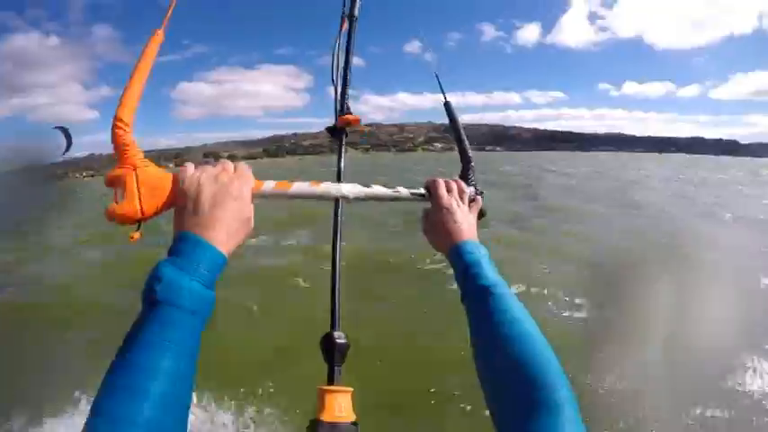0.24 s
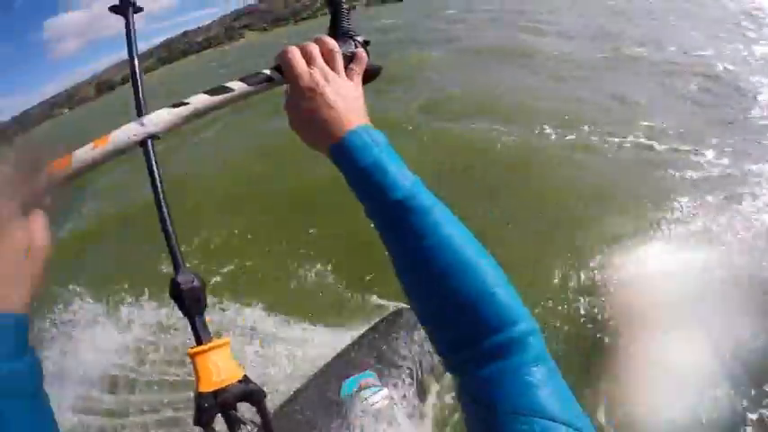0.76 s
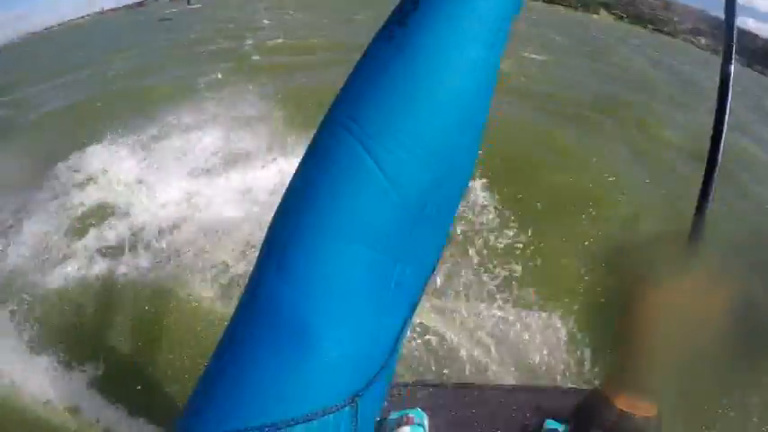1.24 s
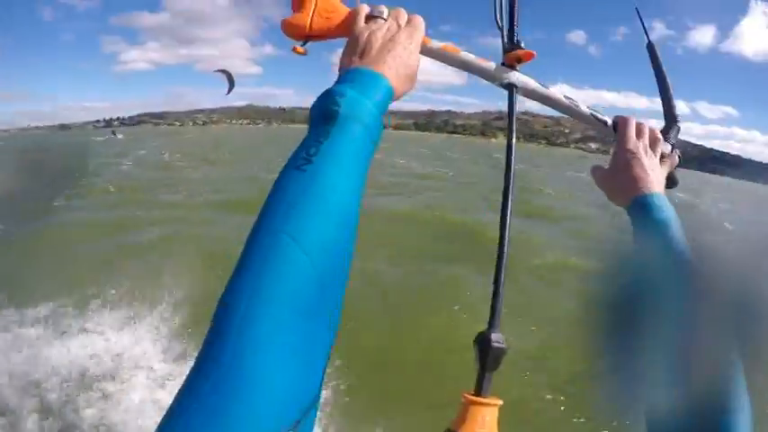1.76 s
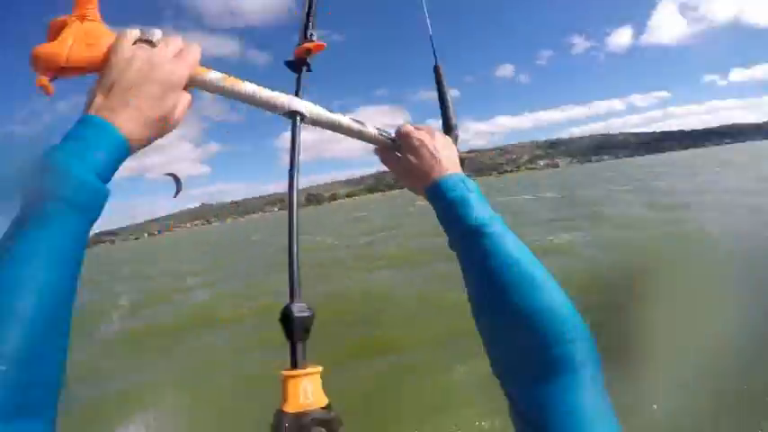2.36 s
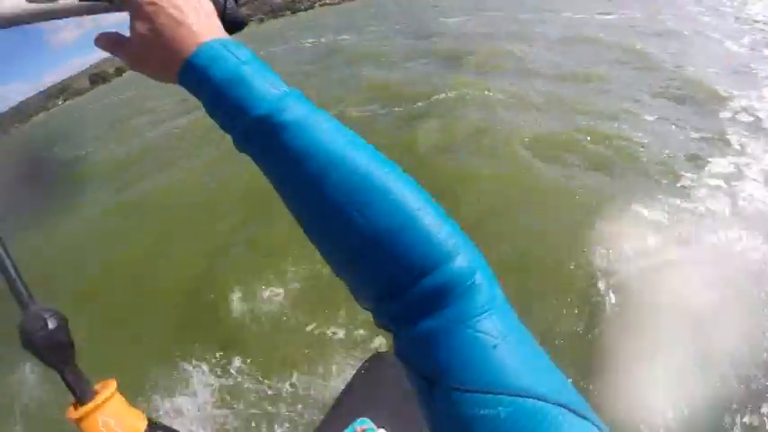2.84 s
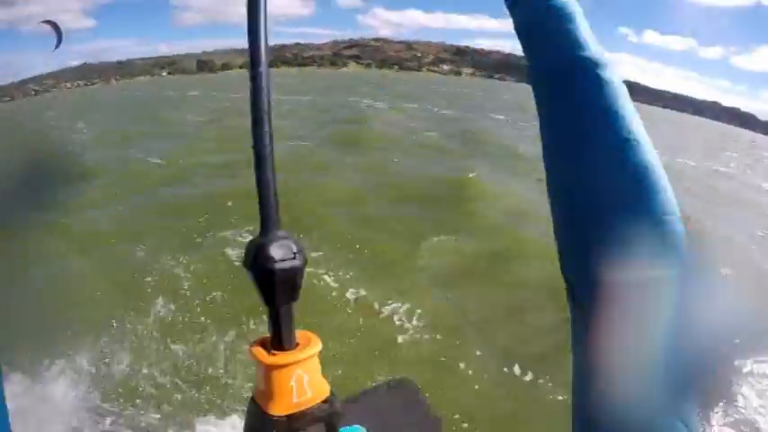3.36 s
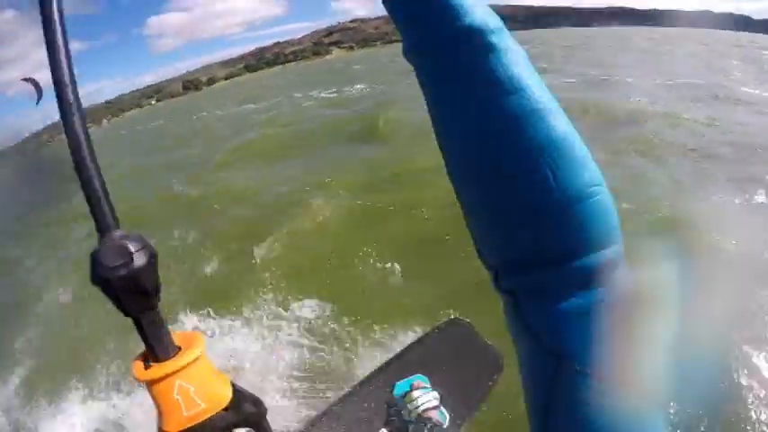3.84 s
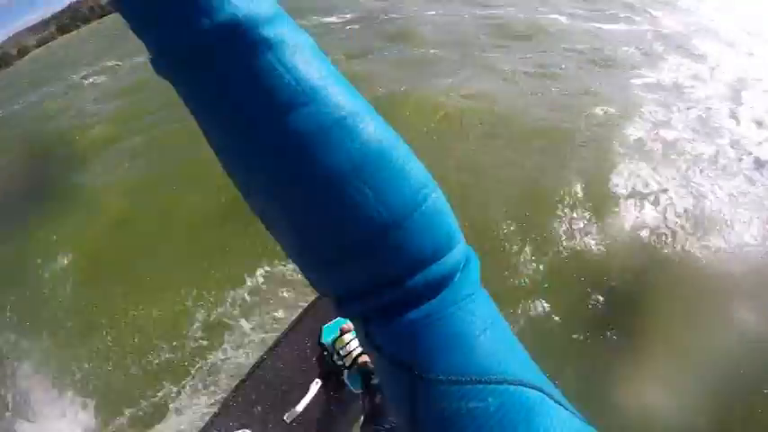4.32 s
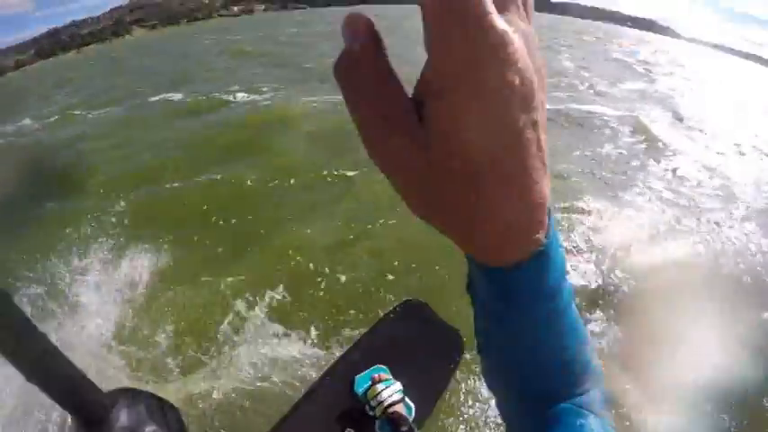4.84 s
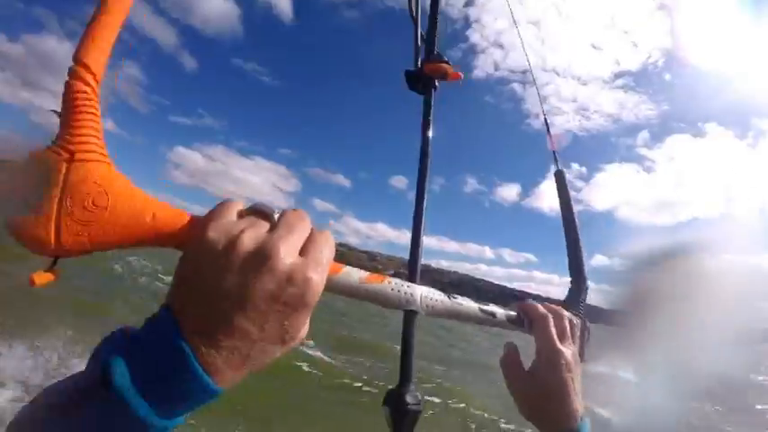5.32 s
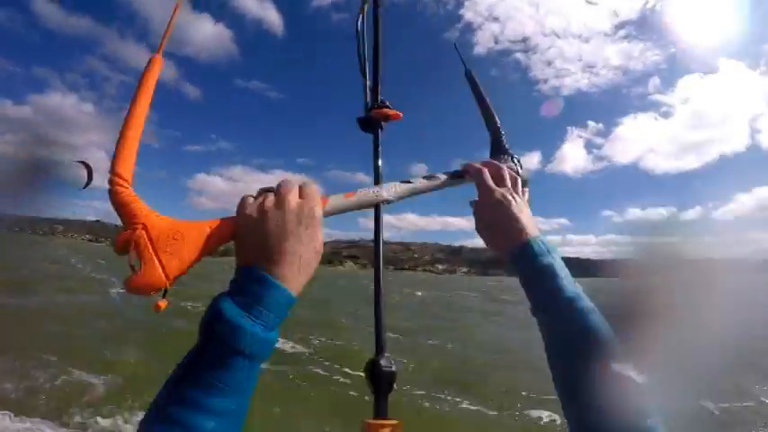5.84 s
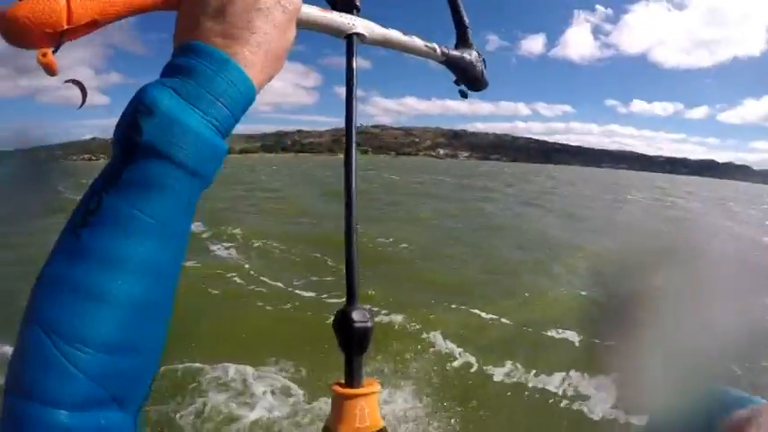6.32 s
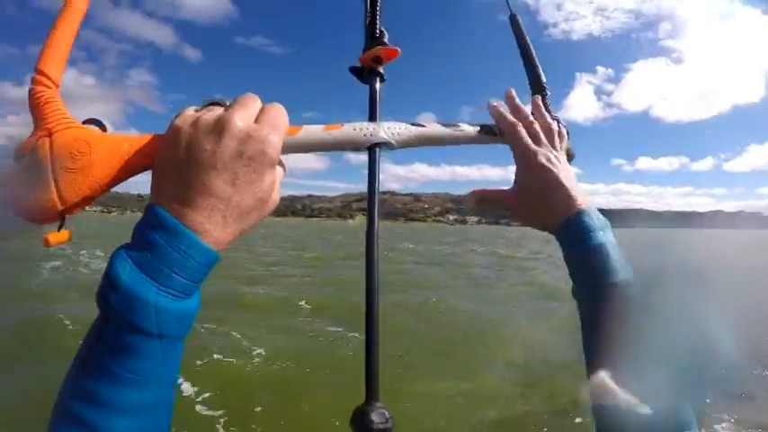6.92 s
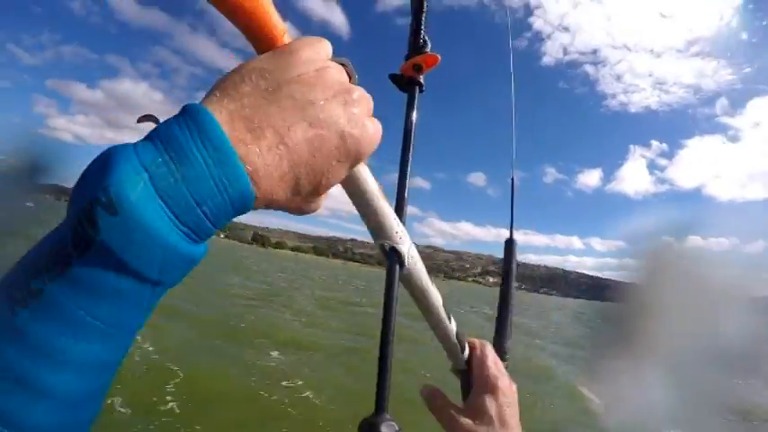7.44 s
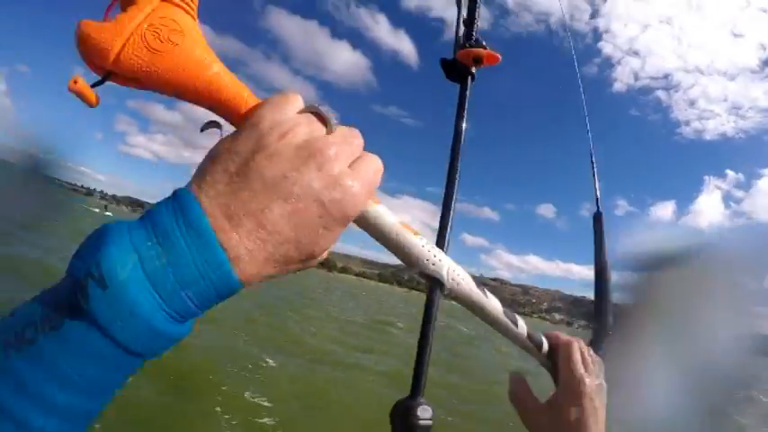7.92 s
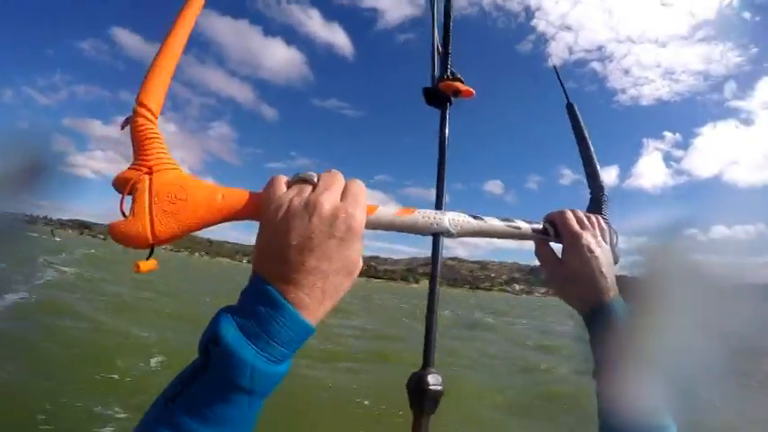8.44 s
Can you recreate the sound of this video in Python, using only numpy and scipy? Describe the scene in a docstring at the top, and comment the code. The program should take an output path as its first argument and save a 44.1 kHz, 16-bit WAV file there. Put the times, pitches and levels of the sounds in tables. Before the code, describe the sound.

Lumpy low wind rumble and rushing, hissing wake from a kiteboard, a few dull thumps, then a hand knocks hard on the camera housing.

```python
"""A lumpy wind rumble and a rushing, hissing wake fill a kiteboard ride, heard inside a waterproof housing.
Wind, rush and spray are shaped noise, with random grains in the water; chop drums dully on the board and the
kite lines sing faintly as narrow bands of noise. A few low thumps come early, the first two from wind buffets;
from about 6.2 s a hand rubs and knocks the housing: grainy noise, ringing modes and more low thumps. The two
hardest knocks, near 6.7 s, duck the camera's gain, which creeps back as the ride goes on more quietly."""
import sys
import numpy as np
from scipy import signal
from scipy.fft import rfft, irfft
from scipy.io import wavfile
from scipy.ndimage import uniform_filter1d

SR = 44100
rng = np.random.default_rng(int(sys.argv[2]) if len(sys.argv) > 2 else 0)


def materialize(psi):
    """Save the field psi as 16-bit PCM at rate SR to the path in sys.argv[1].

    A 1-D psi becomes a single channel; in a 2-D psi each row is a channel.
    """
    bounded = np.clip(np.atleast_2d(psi).T, -1, 1)
    quanta = np.round(bounded * 32767).astype(np.int16)
    wavfile.write(sys.argv[1], SR, quanta)


N = 382788
TIME = np.arange(N) / SR  # s
HZ = np.fft.rfftfreq(N, 1 / SR)

# All levels below are set at the source, ahead of layer trims, the housing and the gain control.

# Gusts on the housing. Each row: peak time in seconds, level in dB.
GUSTS = [(0.079, -32), (0.33, -36), (0.61, -32.5), (.85, -40), (1.05, -34), (1.24, -32.5), (1.64, -23.5),
         (1.84, -31), (2.09, -25.5), (2.37, -31), (2.62, -33.5), (2.85, -41), (3.12, -31.5), (3.36, -35.5),
         (4.05, -32), (4.26, -30), (4.47, -29), (4.8, -30), (5.17, -30.5), (5.36, -28.5), (5.58, -37.5),
         (5.76, -33.5), (5.94, -37.5), (7.02, -34.5), (7.28, -33), (7.45, -38), (7.68, -38), (7.85, -36),
         (8.22, -33)]
GUST_RISE_S, GUST_FALL_S = 0.056, 0.064
BREEZE_DB, BREEZE_FOLLOW = -36, 0.22  # steady headwind, and its dB per dB of the wake

# The kite pulls and its lines sing.
# Each row: start and end in seconds, hum of the thick lines in dB, whistle of a thin line in dB.
PULLS = [(1.13, 1.35, -52, -55), (1.48, 1.72, -56, -58), (2.02, 2.12, -51.5, -47), (2.3, 2.38, -55.5, -50),
         (2.62, 2.85, -73, -54), (4.2, 5.8, -65, -66), (7.3, 8.5, -66, -75)]
HUM_COLUMN, WHISTLE_COLUMN = 2, 3
HUM_REST_DB, WHISTLE_REST_DB = -74.5, -64  # the lines between pulls
SING_FOLLOW = 0.3  # dB per dB of the wake, between pulls
SING_RISE_S, SING_FALL_S = 0.062, 0.07
# Tones of the thick lines and of the thin one. Each row: frequency in Hz, width in Hz, level in dB.
LINE_TONES = [(567, 46, -4), (659, 47, -8)]
WHISTLE_TONES = [(2460, 100, 0)]

# Chop drumming on the underside of the board. Each row: time in seconds, level in dB.
CHOP = [(0, -53), (.95, -52), (1.15, -48.5), (1.6, -50), (2.1, -50.5), (3.5, -51.5), (3.75, -57.5),
        (4.16, -46.5), (4.9, -47), (5.3, -49.5), (6.1, -54), (7.4, -56), (8.68, -58.5)]

# How hard the board's edge churns the water. Each row: time in seconds, level in dB.
WAKE = [(0, -43), (.14, -45), (.3, -41.5), (.85, -43), (1.0, -43.5), (1.3, -43.5), (1.7, -40.5),
        (2.2, -42.5), (2.5, -40.5), (3.1, -41.5), (3.75, -45.5), (4.0, -42.5), (4.2, -40.5), (5.6, -41),
        (6.1, -45.5), (7.4, -48.5), (8.15, -50.5), (8.68, -49)]
# The edge digs into a wave and the rush swells. Each row: peak time in seconds, level in dB, length in seconds.
CARVES = [(.35, -48, 0.12), (.8, -44.5, 0.19), (1.6, -44, 0.19), (2.04, -42.5, 0.081), (2.34, -37.5, 0.15),
          (4.22, -42.5, 0.24), (4.6, -40, 0.19), (5.2, -44, 0.13), (7.38, -47.5, .2), (7.97, -47.5, 0.11)]
# The board meets a wave and throws a sheet of spray.
# Each row: peak time in seconds, hiss level in dB, length in seconds.
SPRAYS = [(0.477, -46, 0.21), (0.777, -49.5, 0.29), (0.95, -45.5, 0.076), (1.132, -45.5, 0.28),
          (1.603, -44.5, 0.3), (1.77, -46, 0.21), (2.04, -47.5, 0.17), (2.198, -46, 0.21),
          (2.35, -43, 0.16), (2.69, -45, 0.14), (3.16, -44.5, 0.3), (3.66, -47, 0.2), (3.812, -46, 0.17),
          (4.28, -46.5, 0.28), (4.573, -47, 0.37), (5.193, -42.5, 0.12), (5.565, -50, 0.21),
          (5.8, -48, 0.28), (7.273, -52.5, 0.18), (7.45, -58, 0.15), (7.998, -57.5, 0.11),
          (8.22, -61, 0.14), (8.556, -58, 0.48)]
WAVE_RISE_SHARE = 0.51  # part of a spray's or carve's length spent rising
# Fine spray that trails the board between the sheets. Each row: time in seconds, hiss level in dB.
MIST = [(0, -49.5), (6.1, -50), (7.0, -55.5), (7.7, -58.5), (8.68, -52.5)]
MIST_FIZZ_DB, SHEET_FIZZ_DB = -13, -12.5  # fizz of the finest drops against the hiss
# Lean of the rush to the treble: without spray, and added by a full sheet.
BUBBLE_TILT_DB, SPRAY_TILT_DB = -1, 1

# Strokes of the hand on the housing.
# Each row: peak time in seconds, level in dB, rise and fall in seconds, grip from 0 (brushing) to 1 (scraping).
RUBS = [(6.267, -27, 0.022, 0.0086, 0.83), (6.29, -28.5, 0.013, 0.018, 0.92),
        (6.484, -28.5, 0.0083, 0.0054, 0.022), (6.49, -30, .047, 0.039, 0.0093),
        (6.632, -15, 0.0033, 0.01, 0), (6.74, -14.5, 0.0064, 0.014, 0.25)]

# Pressure thumps on the microphone.
# Each row: start in seconds, level in dB, starting and settled pitch in Hz, rise and 60 dB decay in seconds.
THUMPS = [(1.589, 4.5, 34, 34, 0.031, 0.12), (2.118, -13, 24, 23.2, 0.01, .24),
          (5.006, 6, 74, 64.6, 0.0087, 0.088), (5.039, -6.5, 72, 72, 0.0084, 0.16),
          (6.2286, 4, 144, 55.3, .011, .16), (6.288, 9.5, 62, 58.4, .019, .13),
          (6.445, -7.5, 60, 37.7, 0.01, 0.22), (6.489, 5, 94, 45, 0.0029, 0.15),
          (6.639, 11.5, 146, 42.6, 0.0027, .11), (6.74, 6.5, 50, 44, 0.0034, 0.067),
          (6.76, 10.5, 111, 54.3, 0.0066, 0.079), (6.862, -6.5, 80, 60, 0.0073, 0.072)]

# Blows on the housing. Each row: start in seconds, ring peak in dB, most excited pitch in Hz,
# ring length as a factor, peak of the sharp tick in dB.
KNOCKS = [(6.2113, -28, 2300, .9, -37), (6.2481, -5, 850, 0.59, -16), (6.2638, -16.5, 700, 0.63, -28),
          (6.2682, -18, 2400, 1.0, -14.5), (6.289, -27, 4000, .9, -31), (6.3015, -20, 600, 1.1, -32),
          (6.4118, -34, 1500, .6, -44), (6.6327, 7.5, 2140, 0.69, -1.5), (6.7356, 9.5, 1450, 1.36, -7.5),
          (6.742, 2, 1570, 0.64, -14), (6.7548, 0, 1950, 1.04, -22), (8.413, -38.5, 1340, 1, -52)]
# Modes of the struck shell. Each row: pitch in Hz, level in dB, 60 dB decay in seconds at length factor 1.
SHELL = [(653, 3.5, 0.027), (784, -2.5, 0.018), (1230, 4, 0.019), (1450, 10, 0.026), (1570, 13, 0.024),
         (1550, -7, 0.021), (1980, 11, 0.019), (2240, 17.5, 0.013), (2440, 1, 0.025), (4140, 11, 0.019)]

# Relative spectra of the layers. Each row: frequency in Hz, level in dB per Hz.
RUMBLE = [(8, -7.5), (20, 0.5), (32, 0), (60, -0.5), (85, -5.5), (130, -15.5), (200, -32.5), (600, -62)]  # wind
DRUMMING = [(70, -14), (130, 1.5), (200, -5.5), (290, -10), (400, -19), (800, -36.5)]  # chop under the board
RUSH = [(150, -25), (320, -12.5), (480, -10.5), (800, -11), (1000, -5.5), (1350, -3), (2000, 1),
        (2550, -0.5), (2900, -1.5), (3400, -16), (5000, -27), (12000, -46)]  # churned water
HISS = [(1500, -39.5), (3000, 1), (4000, 2.5), (5200, -3.5), (6300, -2.5), (7600, -8.5), (8700, -16),
        (12000, -34)]  # spray
FIZZ = [(5000, -36), (8500, -2.5), (9700, -2.5), (10600, -6.5), (12800, -0.5), (13500, -9), (15400, -17)]  # finest drops
SCRAPE = [(150, -21), (400, -2), (650, 0.5), (1400, -5.5), (1950, -1.5), (2400, 3), (2950, -16), (3400, -4),
          (3750, -12.5), (4250, -11), (5300, -19), (7200, -22), (10000, -34), (15000, -40)]  # hand, tight grip
BRUSH = [(150, 10.5), (300, -3.5), (550, -9), (780, -22), (1050, -4.5), (1450, -1.5), (1800, -4.5),
         (2350, -6), (3200, -24.5), (4200, -20), (7000, -31), (15000, -49)]  # hand, light grip
TICK = [(150, -0.5), (500, 5), (1200, 13), (2400, -26.5), (3300, 3), (4200, -21), (6500, -8.5), (8500, -16),
        (11000, -32), (15000, -32.5)]  # sharp contact of a knock

# Colour that the housing gives to all sound. Each row: frequency in Hz, width in Hz, boost or cut in dB.
HOUSING = [(1308, 196, 3.5), (2460, 170, 2), (3430, 500, -3), (4300, 220, 3.5), (4530, 160, -5.5),
           (4810, 160, 3.5), (6650, 270, -4.5), (7040, 360, 2), (8800, 750, -2.5), (9350, 340, 3.5),
           (12650, 600, -6)]
LIMIT_DB, LIMIT_ATTACK_S, RECOVERY_DB_PER_S = 0, 0.0048, 15.5  # the camera's gain control
EDGE_HZ = 15350  # band limit of the recorded sound


def gain_of(db):
    """Decibels to amplitude."""
    return 10 ** (np.asarray(db) / 20)


def evened(x):
    """Scales to an rms of 1."""
    return x / np.sqrt(np.mean(x ** 2) + 1e-20)


def level(rows):
    """A dB curve as a gain for every sample."""
    return gain_of(np.interp(TIME, *np.transpose(rows)))


def read(points):
    """A spectrum in dB at every frequency, interpolated along log frequency."""
    hz, db = np.transpose(points)
    return np.interp(np.log(HZ + 1), np.log(hz), db)


def causal(db):
    """Minimum-phase response with this gain, so its ringing follows its cause."""
    both_sides_db = np.concatenate([db, db[-2:0:-1]])
    log_gain = np.log(gain_of(both_sides_db))
    return np.exp(np.conj(signal.hilbert(log_gain)))[:len(HZ)]


def coloured(x, points):
    """Gives x the colour of a spectrum and an rms of 1."""
    return evened(irfft(rfft(x) * causal(read(points)), N))


def below(x, edge_hz):
    """The part of x under a frequency, with a gentle edge."""
    return irfft(rfft(x) / (1 + (HZ / edge_hz) ** 4), N)


def tilted(x, lean, pivot_hz=1900):
    """Small bubbles ring high and large ones low, so their size leans the rush either way."""
    low = below(x, pivot_hz)
    high = x - low
    return low / lean + high * lean


def wander(rate_hz):
    """Smooth random drift of rms 1, mostly slower than the given rate."""
    slow = rfft(rng.standard_normal(N)) * np.exp(-(HZ / rate_hz) ** 2)
    return evened(irfft(slow, N))


def drops(per_s, spread_db):
    """Random impacts of either sign; a positive spread makes a few large, a negative one a few small."""
    size = gain_of(spread_db * np.minimum(rng.exponential(1, N), 5))
    sign = rng.choice([-1, 1], N)
    lands = rng.random(N) < per_s / SR
    return size * sign * lands


def surge(start, end, rise, fall):
    """Envelope that swells up to start, holds until end and dies away."""
    before = np.minimum(TIME - start, 0) / rise
    after = np.maximum(TIME - end, 0) / fall
    return np.exp(-0.5 * before ** 2 - 0.5 * after ** 2)


def swells(rows):
    """Joint strength of waves that each rise and fall away, their powers added."""
    power = 0
    for s, db, length in rows:
        shape = surge(s, s, WAVE_RISE_SHARE * length, (1 - WAVE_RISE_SHARE) * length) ** 2
        power = power + (gain_of(db) * shape) ** 2
    return np.sqrt(power)


def pace(follow):
    """Gain around 1 of a sound that grows with the wake, by so many dB per dB."""
    return evened(level(WAKE)) ** follow


def add(mix, s, sound):
    """Mixes a sound in at time s."""
    part = mix[round(s * SR):][:len(sound)]
    part += sound[:len(part)]


def water(spectrum, per_s, spread_db, grain_db, flutter_db):
    """Near drops and bubbles are grains over a noise wash of far ones; the sheet of water flutters."""
    drive = rng.standard_normal(N) + gain_of(grain_db) * drops(per_s, spread_db)
    flutter = gain_of(flutter_db * wander(35))
    return evened(coloured(drive, spectrum) * flutter)


def wind():
    """Eddies shed by the housing: a lumpy rumble from the headwind and the gusts on top of it."""
    eddies = coloured(rng.standard_normal(N), RUMBLE)
    # Level out the slow swings of the noise so that strength and lumps shape them.
    eddies /= np.sqrt(uniform_filter1d(eddies ** 2, size=8000))
    gust_power = sum((gain_of(db) * surge(s, s, GUST_RISE_S, GUST_FALL_S)) ** 2 for s, db in GUSTS)
    breeze = gain_of(BREEZE_DB) * pace(BREEZE_FOLLOW)
    strength = np.sqrt(breeze ** 2 + gust_power)
    lumps = gain_of(1.17 * wander(8.9))
    return gain_of(-0.5) * strength * eddies * lumps


def kite_line(tones, rest_db, column):
    """Vortices peel off a taut line in narrow, unsteady tones, loudest while the kite pulls."""
    pull_power = 0
    for pull in PULLS:
        envelope = surge(pull[0], pull[1], SING_RISE_S, SING_FALL_S)
        pull_power = pull_power + (gain_of(pull[column]) * envelope) ** 2
    rest = gain_of(rest_db) * pace(SING_FOLLOW)
    strength = np.sqrt(pull_power + rest ** 2)
    bands = sum(gain_of(db) / (1 + ((HZ - hz) / width) ** 2) ** 2 for hz, width, db in tones)
    tone = irfft(rfft(rng.standard_normal(N)) * bands, N)
    sway = gain_of(2.0 * wander(7.1))  # the tone swells and fades as the line sways
    return strength * evened(tone * sway)


def board():
    """Small waves patter against the board in a dull, uneven drumming."""
    patter = water(DRUMMING, per_s=150, spread_db=0, grain_db=-7, flutter_db=1)
    return gain_of(1.1) * level(CHOP) * patter


def wake():
    """The board's edge churns the chop and throws up spray that breaks into fine drops."""
    mist, sheet = level(MIST), swells(SPRAYS)
    churn = np.hypot(level(WAKE), swells(CARVES))
    spray = np.hypot(mist, sheet)
    fine = np.hypot(gain_of(MIST_FIZZ_DB) * mist, gain_of(SHEET_FIZZ_DB) * sheet)
    sheet_share = (sheet / spray) ** 2
    lean = gain_of(BUBBLE_TILT_DB + SPRAY_TILT_DB * sheet_share)
    bubbles = water(RUSH, per_s=1200, spread_db=2.5, grain_db=-5.0, flutter_db=0.89)
    rush = churn * tilted(bubbles, lean)
    hiss = spray * water(HISS, per_s=2500, spread_db=3.5, grain_db=-3.5, flutter_db=0.86)
    fizz = fine * water(FIZZ, per_s=4000, spread_db=-6.0, grain_db=0, flutter_db=1.2)
    return gain_of(-0.5) * rush + gain_of(-0.16) * hiss + gain_of(-0.5) * fizz


def rubs():
    """Wet skin slips on the housing: a tight grip catches in separate snaps, a light one only brushes."""
    snaps = drops(per_s=860, spread_db=3.5) + gain_of(-3.5) * rng.standard_normal(N)
    slips = drops(per_s=2000, spread_db=-0.5) + gain_of(4.5) * rng.standard_normal(N)
    scrape, brush = coloured(snaps, SCRAPE), coloured(slips, BRUSH)
    out = np.zeros(N)
    for s, db, rise, fall, grip in RUBS:
        stroke = gain_of(db) * surge(s, s, rise, fall)
        out += stroke * (np.sqrt(grip) * scrape + np.sqrt(1 - grip) * brush)
    return out


def thumps(settle_s=0.0046):
    """A buffet or shove on the sealed housing swings the air inside; the pitch soon settles, the swing dies."""
    out, t = np.zeros(N), TIME[:SR // 3]
    for s, db, start_hz, end_hz, rise, t60 in THUMPS:
        pitch_hz = end_hz + (start_hz - end_hz) * np.exp(-t / settle_s)
        turns = np.cumsum(pitch_hz) / SR
        swell = (1 - np.exp(-(t / rise) ** 2)) * np.exp(-np.log(1000) * t / t60)
        add(out, s, -gain_of(db) * swell * np.sin(2 * np.pi * turns))
    return out


def knocks(focus_octaves=0.39, spill=0.14, contact_s=0.0007):
    """Each blow ticks and rings the shell; where it lands decides which modes speak most."""
    out, t = np.zeros(N), TIME[:SR // 10]
    tick = irfft(causal(read(TICK)), N)[:len(t)]
    hz, db, t60 = np.transpose(SHELL)[:, :, None]  # one row per mode, time along the columns
    for s, ring_db, pitch_hz, length, tick_db in KNOCKS:
        octaves_away = np.log2(hz / pitch_hz)
        weight = gain_of(db) * (spill + np.exp(-(octaves_away / focus_octaves) ** 2))
        decay = gain_of(-60 * t / (t60 * length))
        ring = (weight * decay * np.sin(2 * np.pi * hz * t)).sum(0)
        ring *= 1 - np.exp(-t / contact_s)  # soft onset
        add(out, s, gain_of(ring_db) * ring / abs(ring).max())
        add(out, s + contact_s, gain_of(tick_db) * tick / abs(tick).max())
    return out


def scene():
    """Everything reaches one microphone."""
    hum = kite_line(LINE_TONES, HUM_REST_DB, HUM_COLUMN)
    whistle = kite_line(WHISTLE_TONES, WHISTLE_REST_DB, WHISTLE_COLUMN)
    mix = wind() + hum + whistle + board() + wake() + rubs() + thumps() + knocks()
    return mix[None]  # one channel


def limited(x):
    """Gain control: a peak over the limit turns everything down, and the gain creeps back."""
    peak_db = 20 * np.log10(abs(x).max(0) + 1e-9)
    over_db = np.maximum(peak_db - LIMIT_DB, 0)
    # A running maximum against a rising ramp holds each cut and releases it at a steady rate.
    recovered = RECOVERY_DB_PER_S * TIME
    cut_db = np.maximum.accumulate(over_db + recovered) - recovered
    keep = np.exp(-1 / (LIMIT_ATTACK_S * SR))
    smooth_cut_db = signal.lfilter([1 - keep], [1, -keep], cut_db)
    return x / gain_of(smooth_cut_db)


def record(dry):
    """The housing colours the sound, the gain control ducks, the input overloads softly, then the band limit."""
    colour_db = sum(db / (1 + (2 * (HZ - hz) / width) ** 2) for hz, width, db in HOUSING)
    inside = limited(irfft(rfft(dry) * causal(colour_db), N))
    clipped = inside / (1 + inside ** 6) ** (1 / 6)
    band_limit = signal.firwin(401, EDGE_HZ, window=("kaiser", 8), fs=SR)
    return signal.oaconvolve(clipped, band_limit[None], "same")


dry = scene()
out = record(dry)
materialize(out)
```